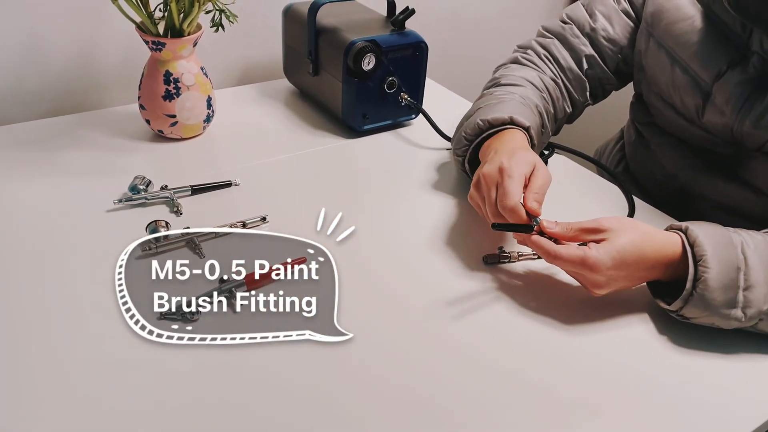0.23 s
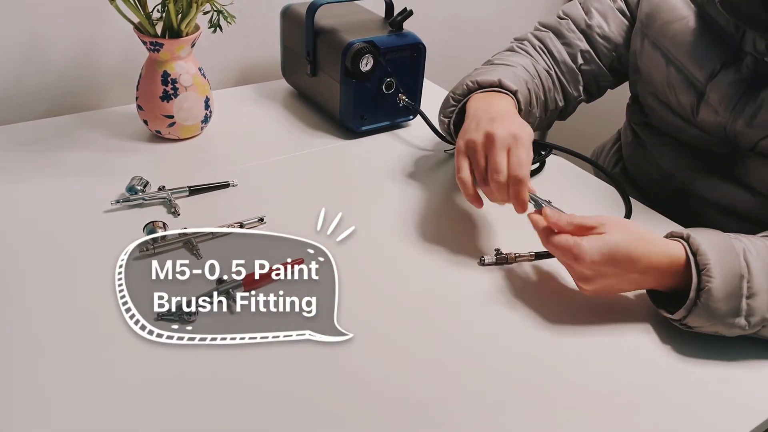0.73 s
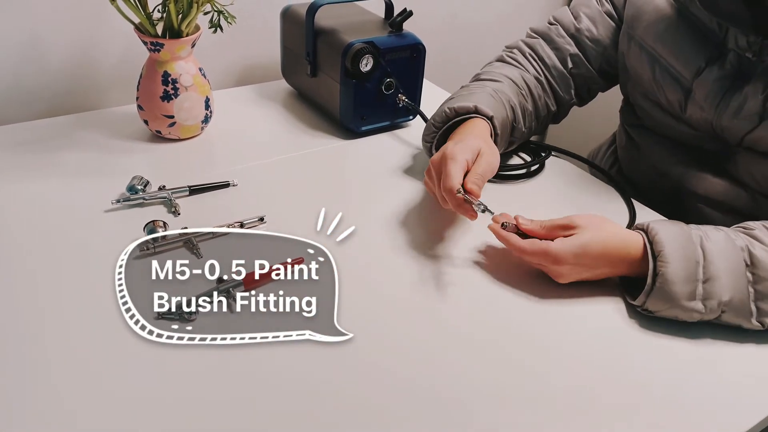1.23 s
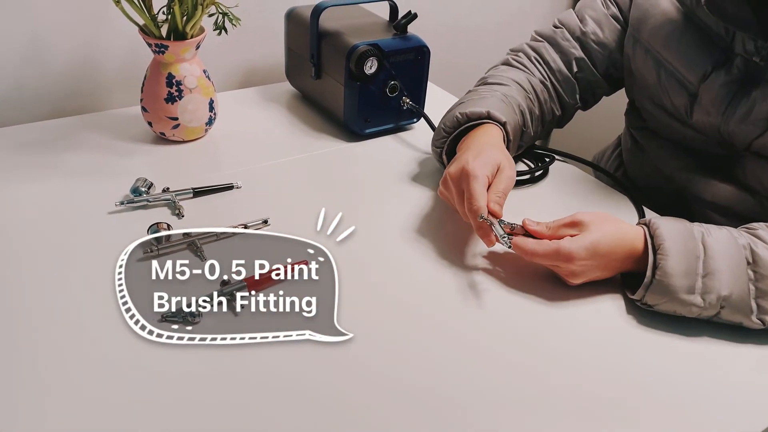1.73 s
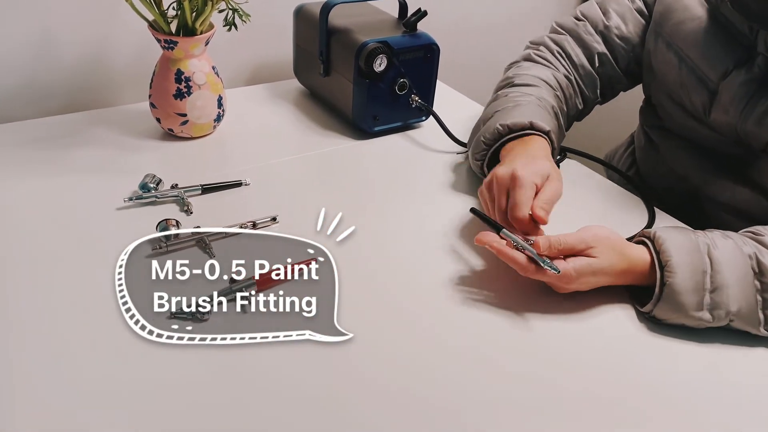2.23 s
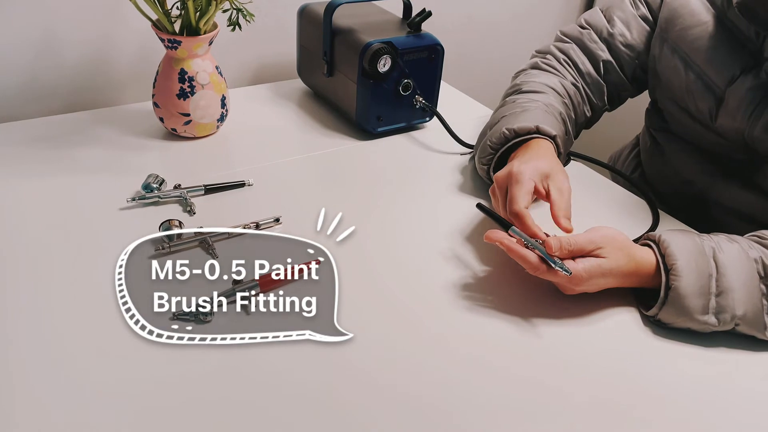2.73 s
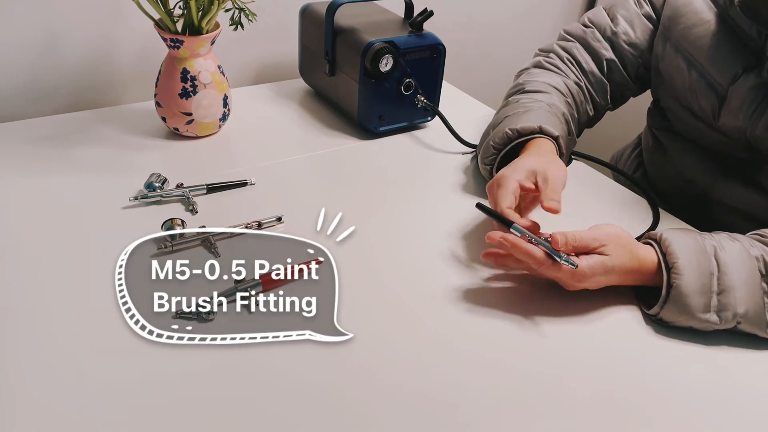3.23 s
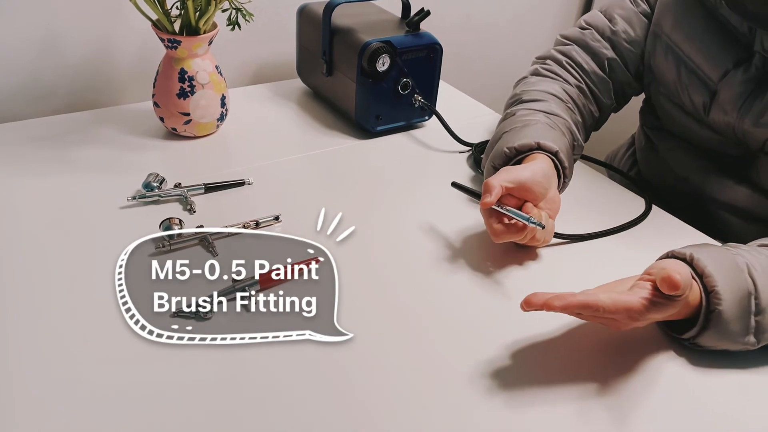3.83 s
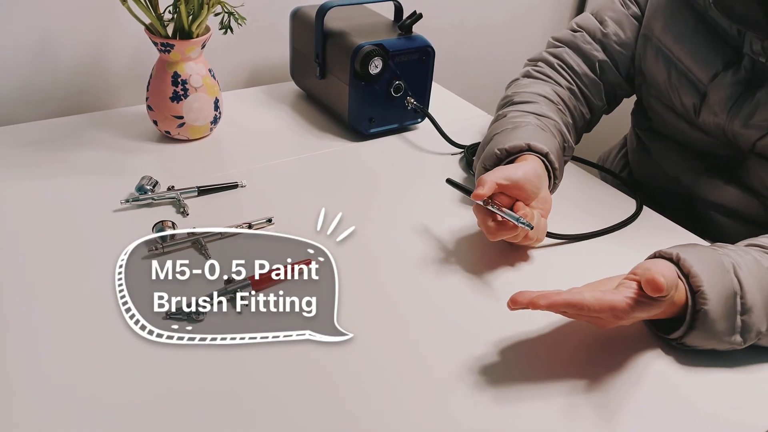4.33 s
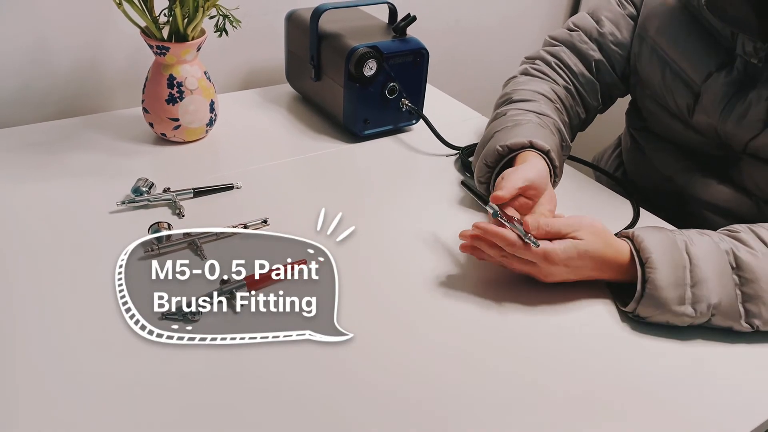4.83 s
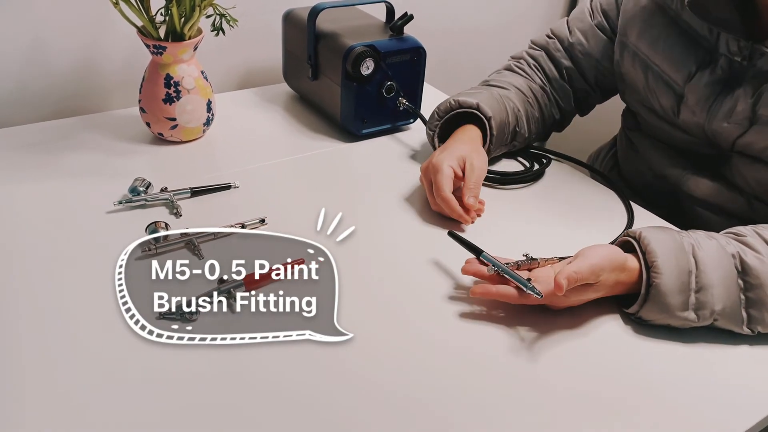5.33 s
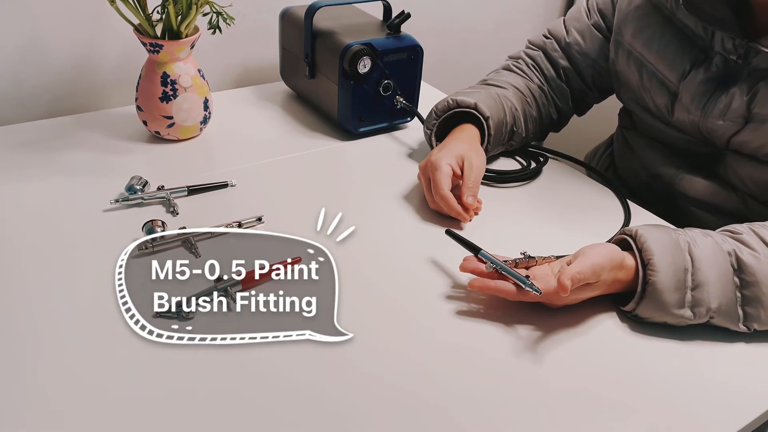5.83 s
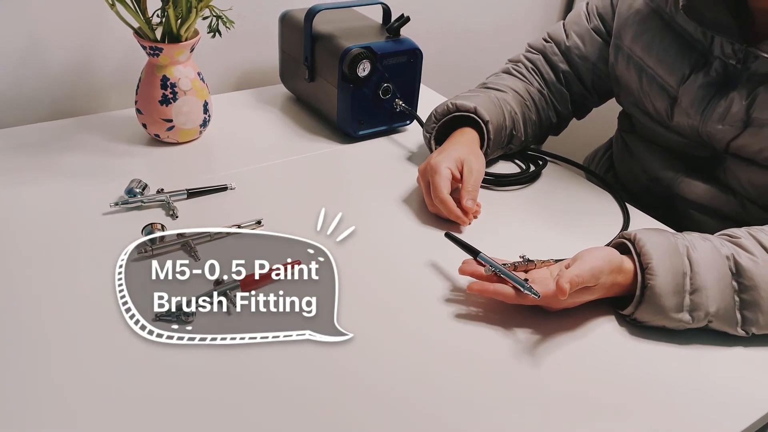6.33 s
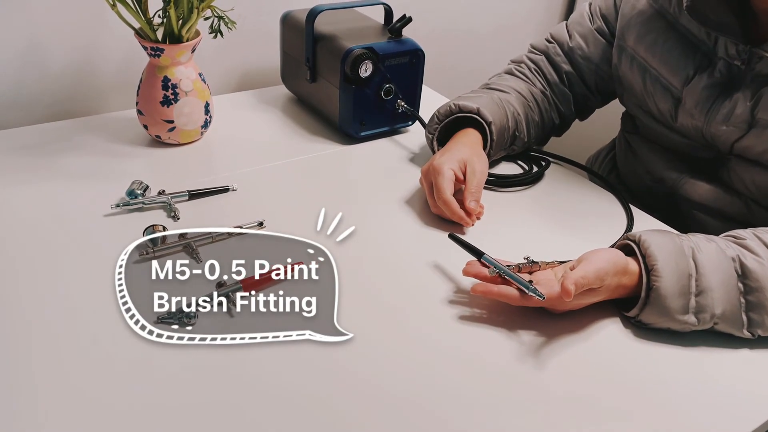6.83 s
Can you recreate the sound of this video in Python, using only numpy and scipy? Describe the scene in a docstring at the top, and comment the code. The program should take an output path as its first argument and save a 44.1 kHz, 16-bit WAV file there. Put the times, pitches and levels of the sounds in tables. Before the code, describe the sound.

Nylon sleeves swish and small metal parts click at a table, then five short air hisses and a little compressor hums up in pitch.

```python
"""Sleeves swish and metal parts click as hands fit an airbrush together at a table in a small room.
Air hisses out in five short bursts; a small piston compressor starts and its hum climbs in pitch.
Cloth, air and metal are shaped noise under timed envelopes; short reflections add the room.
The hum is a set of shaft harmonics gliding through fixed resonances of the case and the table."""
import sys
import numpy as np
from scipy import signal
from scipy.fft import rfft, irfft
from scipy.io import wavfile
from scipy.ndimage import uniform_filter1d

SR = 44100
rng = np.random.default_rng(int(sys.argv[2]) if len(sys.argv) > 2 else 0)


def unload_wav(signal):
    """Save mono or channel-first audio to the path in sys.argv[1] as 16-bit WAV at rate SR, clipped to [-1, 1]."""
    wavfile.write(
        sys.argv[1],
        SR,
        np.round(np.clip(np.atleast_2d(signal).T, -1, 1) * 32767).astype(np.int16),
    )


N = 313110
T = np.arange(N) / SR  # time of each sample (s)
BINS = np.fft.rfftfreq(N, 1 / SR)  # frequency of each spectrum bin (Hz)

# Motor speed: a quick spin-up, then a slow climb; two strokes per shaft turn: t/s, strokes per second
SPEED = [(4.0, 30.0), (4.08, 70.0), (4.14, 90.4), (4.25, 104.3), (4.3, 105.25), (4.37, 105.7),
         (4.43, 107.7), (4.49, 108.3), (4.62, 107.55), (4.78, 109.3), (5.04, 111.9), (5.11, 113.25),
         (5.27, 115.1), (5.31, 116.5), (5.39, 117.7), (5.46, 119.4), (5.56, 119.65), (5.6, 120.85),
         (5.77, 122.4), (5.88, 124.8), (5.94, 126.55), (6.04, 128.35), (6.19, 128.45), (6.28, 129.8),
         (6.36, 131.9), (6.51, 134.15), (6.68, 136.25), (6.78, 137.8), (6.87, 139.85), (6.97, 141.3),
         (7.1, 142.8)]
START_S = SPEED[0][0]


def amp(db):
    """Turn decibels into a gain."""
    return 10 ** (np.asarray(db) / 20)


def evened(x):
    """Scale to rms 1."""
    return x / np.sqrt(np.mean(x ** 2) + 1e-20)


def curve(rows):
    """Draw straight lines in time through (t/s, value) points."""
    return np.interp(T, *np.transpose(rows))


def read(points, hz):
    """Draw straight lines through (f/Hz, value) points on a log-frequency axis."""
    f, value = np.transpose(points)
    return np.interp(np.log(hz + 1), np.log(f + 1), value)


def placed(x, left_db):
    """Lean a sound to the left by a level difference between the two sides."""
    return x * amp(np.array([[left_db], [-left_db]]) / 2)


def lean_by_pitch(points):
    """Left and right gains for each bin, from (f/Hz, left minus right/dB) points."""
    return amp(np.array([[.5], [-.5]]) * read(points, BINS))


def resonances(modes, hz):
    """Complex gain of peaks and notches; the phase swings as a tone crosses each."""
    return amp(sum(db / (1 + 2j * (hz - f) / width) for f, width, db in modes))


def noise(spectrum, colour=1, likeness=None):
    """Stereo noise of rms 1; sharing one source between the sides sets how alike they are."""
    # Usual likeness of left and right: f/Hz, likeness (1 = identical)
    usual_likeness = [(100, 0.99), (500, 0.91), (1000, 0.59), (2000, 0.6), (5000, 0.53), (10000, 0.74),
                      (15000, 0.1)]
    shared, other = rfft(rng.standard_normal((2, N)))
    points = usual_likeness if likeness is None else likeness
    alike = np.clip(read(points, BINS), -1, 1)
    pair = np.array([shared, alike * shared + np.sqrt(1 - alike ** 2) * other])
    return evened(irfft(pair * amp(read(spectrum, BINS)) * colour, N))


def wander(count):
    """Chance drift of rms 1: straight lines between count random points a second."""
    knots = rng.standard_normal(8 * count)
    return evened(np.interp(T * count, np.arange(len(knots)), knots))


def strikes(times, levels_db, decay):
    """Envelope of blows that rise within 8 samples and die away exponentially."""
    total = 0
    for s, db, decay_s in np.broadcast(times, levels_db, decay):
        attack = np.clip((T - s) * SR / 8, 0, 1)
        total = total + amp(db) * attack * np.exp(-np.clip((T - s) / decay_s, 0, 20))
    return total


def gestures(rows, rise_s, fall_s):
    """Envelope of movements (t/s, length/s, level/dB) that ease in, hold and die away."""
    total = 0
    for s, length, db in rows:
        rise = np.sin(np.pi / 2 * np.clip((T - s) / rise_s, 0, 1)) ** 2
        total = total + amp(db) * rise * np.exp(-np.clip((T - s - length) / fall_s, 0, 20))
    return total


def room(x):
    """Sparse reflections from the room, each band dying at its own speed."""
    # Room decay: f/Hz, time to fall by 60 dB/s
    decay_times = [(100, 0.23), (500, 0.15), (2000, 0.28), (8000, 0.27), (15000, 0.26)]
    taps = rng.standard_normal((2, SR // 2)) * (rng.random((2, SR // 2)) < .15)
    taps[:, :130] = 0  # no reflection in the first 3 ms
    hz, t, bands = signal.stft(taps, SR, nperseg=256)
    fading = amp(-60 * t / read(decay_times, hz)[:, None])
    tail = signal.istft(bands * fading, SR, nperseg=256)[1]
    return signal.fftconvolve(x, tail / np.linalg.norm(tail[0]), axes=1)[:, :N]


def background(restless_db=2):
    """Room tone, the table booming softly under the arms, and forearm bumps ringing its lowest mode."""
    # Room tone: f/Hz, level/dB per Hz
    room_tone = [(15, -75), (30, -48), (42, -13), (53, 6), (70, -6.5), (100, -4.5), (135, 3), (200, -4),
                 (300, -14), (500, -23.5), (1000, -27), (1600, -24), (2800, -46), (5000, -41),
                 (9000, -37.5), (14000, -69), (15800, -54)]
    # The table's dull boom: f/Hz, level/dB per Hz
    boom = [(20, -70), (31, -48), (40, -18), (55, -20), (75, -7.5), (118, 1.5), (140, 5.5), (170, -20),
            (200, 0.5), (260, -12.5), (500, -16.5), (900, -30), (2000, -56)]
    # A forearm bumps the table: t/s, level/dB
    bump_rows = [(1.8, -50), (2.478, -46.5), (2.641, -45.5), (2.68, -49), (2.858, -51)]
    # The arms shift their weight on the table: t/s, length/s, level/dB
    shifts = [(.53, 0.15, -57.5), (.72, 0.041, -59), (1.65, 0.023, -52.5), (1.76, 0.048, -62),
              (2.17, 0.11, -59.5), (2.7, 0.049, -63), (3.39, 0.098, -54), (3.62, 0.74, -58)]
    mode_hz, swell_s = 119, 0.018  # the table's lowest mode and the time it takes to swell
    quiet_db, resting_arms_db = -63.5, -65

    swelling = 0
    for s, db in bump_rows:
        u = np.clip((T - s) / swell_s, 0, 30)
        swelling = swelling + amp(db) * u * np.exp(1 - u)
    bumps = swelling * np.sin(2 * np.pi * mode_hz * T)
    resting = amp(resting_arms_db + restless_db * wander(count=12))
    weight = np.hypot(resting, gestures(shifts, rise_s=0.018, fall_s=0.069))
    hush = noise(room_tone) * amp(quiet_db + 1.7 * wander(count=9))
    return placed(hush + noise(boom) * weight + bumps, left_db=1)


def sleeves(patchy_db=1.47, grain_db=0.5):
    """Nylon slides over the table with fine grain and crackling creases; a small part scrapes too."""
    # The hiss of nylon: f/Hz, level/dB per Hz
    cloth = [(240, -36), (400, -5), (606, -10.5), (890, -9), (2490, -4), (3610, -7.5), (5900, -6.5),
             (11600, -11.5), (14400, -13.5), (15800, -26)]
    # Strokes of a sleeve over the table: t/s, length/s, level/dB, release/s
    swishes = [(0.502, 0.1, -72, 0.024), (0.678, 0.08, -73.5, .056), (0.79, 0.094, -63, 0.06),
               (0.916, 0.096, -66.5, 0.064), (1.015, 0.088, -65, 0.058), (1.136, 0.12, -72, 0.1),
               (1.814, 0.19, -74.5, .05), (1.883, 0.19, -66.5, 0.034), (1.973, .08, -72, .03),
               (2.11, 0.14, -62, 0.037), (2.247, 0.099, -72.5, 0.0073), (3.202, 0.091, -57.5, 0.11),
               (3.429, 0.13, -63, 0.029)]
    # Crackling creases: snaps per second, level above the swish/dB, spread of sizes/dB
    rate, crease_db, spread_db = (260, -8.5, 6)
    # The sound of the scrape: f/Hz, level/dB per Hz
    grate = [(1000, -38), (1700, -2), (2150, -6), (2700, -5), (4500, -38)]
    # A small part scrapes over the table: t/s, length/s, level/dB
    scrape_row = (1.053, 0.056, -64.5)
    stir_db = -82  # the jacket never quite keeps still

    grain = amp(patchy_db * wander(count=40) + grain_db * wander(count=900))
    sizes = amp(spread_db * np.minimum(rng.exponential(1, N), 3))
    snaps = (rng.random(N) < rate / SR) * sizes
    snap_decay = np.exp(-T[:200] / .0006)
    crackle = amp(crease_db) * evened(signal.oaconvolve(snaps, snap_decay)[:N])
    slide = amp(stir_db) + sum(gestures([row[:3]], 0.065, row[3]) for row in swishes)
    swish = noise(cloth) * slide * np.hypot(1, crackle)
    scraping = gestures([scrape_row], rise_s=.06, fall_s=0.11) * amp(3.0 * wander(count=260))
    return placed(swish * grain + noise(grate) * scraping, left_db=2.5)


def fittings():
    """Sharp metal ticks with duller knocks under them, a snapping cap and a part touching the table."""
    # Metal parts click: t/s, tick level/dB, tick decay/s, knock through the hand before an 11.5 dB cut/dB
    clicks = [(0.9625, -48, 0.0016, -62), (1.3224, -45.5, 0.0018, -54), (1.366, -55.5, 0.0058, -66),
              (1.5203, -43, 0.00057, -43), (1.5239, -38, 0.0019, -44.5), (1.653, -58, 0.009, -50),
              (1.7527, -57, 0.00091, -52), (1.7553, -33, 0.0014, -33), (1.896, -50.5, .0025, -59),
              (1.9198, -56, .003, -44), (2.2408, -54, .0012, -62), (2.943, -72, .006, -66),
              (3.17, -71, .004, -64), (3.384, -57, .002, -58)]
    # Sound of the ticks: f/Hz, level/dB per Hz
    tick = [(300, -25), (1000, -2), (2700, 0), (5000, -7), (8000, -4.5), (12000, 1), (15500, -9)]
    # Sound of the knocks: f/Hz, level/dB per Hz
    knock = [(60, -27), (115, 11), (220, -11), (390, -4.5), (500, 5.5), (750, -3), (1300, -19), (3000, -15),
             (8000, -22)]
    # The cap snaps into its seat: t/s, level/dB
    cap_snaps = [(2.2407, -46)]
    # The cap's hollow ring: f/Hz, level/dB per Hz
    cap_ring = [(700, -23), (1200, -10), (1500, 6), (2000, 0), (3000, -6.5), (4500, -14), (9000, -34),
                (15000, -36)]
    # A part touches the table top: t/s, level/dB
    touches = [(0.929, -51), (0.937, -58), (0.956, -53.5), (0.965, -51), (0.973, -57), (0.986, -59)]
    # The ring of that touch: f/Hz, level/dB per Hz
    clack = [(400, -5), (850, -3), (1250, 8), (1600, -1), (2100, -2.5), (3200, -13), (8000, -23),
             (15000, -24)]

    s, tick_db, tick_s, knock_db = np.transpose(clicks)
    ticks = noise(tick) * strikes(s, tick_db, tick_s)
    knocks = noise(knock) * strikes(s, knock_db - 11.5, decay=0.027)
    snaps = noise(cap_ring) * strikes(*np.transpose(cap_snaps), decay=0.0076)
    taps = noise(clack) * strikes(*np.transpose(touches), decay=0.012)
    return placed(ticks + knocks + snaps + taps, left_db=2.0)


def airbrush(shut_s=0.011, sag_db_per_s=14):
    """The valve snaps open and the jet of air weakens as the hose empties; the trigger squeaks once."""
    # Trigger presses: open t/s, shut t/s, level before the jet's gain of about 3.5 dB/dB
    presses = [(3.605, 3.715, -38.5), (3.795, 3.899, -39.5), (3.991, 4.103, -41), (4.182, 4.304, -42.5),
               (4.384, 4.55, -43.5)]
    # Sound of the jet: f/Hz, level/dB per Hz
    jet_spectrum = [(120, -25), (200, -16), (330, -5), (440, -6), (520, -10.5), (588, -1.5), (660, -10.5),
                    (803, -17), (950, -16.5), (1100, -14.5), (1200, -12), (1400, -14.5), (2000, -18.5),
                    (2590, -17), (4160, -16.5), (8800, -12.5), (12900, -7), (14800, -9), (15800, -23)]
    # The jet's lean to the left: f/Hz, left minus right/dB
    jet_side = [(60, -5), (110, -9), (200, 0), (380, 1), (700, -0.5), (1290, 4), (2380, 0), (4400, 0),
                (8120, 4.5), (15000, 0)]
    # Likeness of the jet's two sides: f/Hz, likeness (1 = identical)
    jet_likeness = [(500, 1), (2000, 0.92), (5000, 0.81), (8500, 0.92), (11000, 0.52), (14000, 0.14)]
    # Colour of the nozzle: f/Hz, width/Hz, level/dB
    nozzle = [(750, 220, 11.5), (7700, 1500, 1.5), (8940, 600, 5.5)]
    # The trigger's squeak: t/s, length/s, middle f/Hz
    s, length, hz = (4.039, .032, 3850)
    squeak_db = -39.5

    flow = 0
    for opens, shuts, db in presses:
        opening = np.clip((T - opens) / .005, 0, 1)
        closing = np.exp(-np.clip((T - shuts) / shut_s, 0, 20))
        sagging = amp(db - sag_db_per_s * np.clip(T - opens, 0, shuts - opens))
        flow = flow + sagging * opening * closing
    colour = resonances(nozzle, BINS) * lean_by_pitch(jet_side)
    jet = noise(jet_spectrum, colour, jet_likeness) * flow * amp(3.5 + .5 * wander(count=120))
    tone = np.sin(2 * np.pi * np.cumsum(hz + 60 * wander(count=400)) / SR)
    squeak = tone * np.sin(np.pi * np.clip((T - s) / length, 0, 1))
    return jet + amp(squeak_db) * squeak


def scatter(hz, decay):
    """Complex gain of a cluster of short reflections, rms 1."""
    t = np.arange(4096) / SR
    cluster = rng.standard_normal(len(t)) * np.exp(-t / decay)
    response = rfft(cluster, 2 * (len(hz) - 1))
    return evened(abs(response)) * np.exp(1j * np.angle(response))


def hum(turns, shaft_hz, ring_s=0.026, scatter_hz=1900, spread_hz=1100, smear=0.418, loose_order=20.5,
        lopsided=0.29, count=72):
    """Shaft harmonics glide through fixed resonances; high ones lose step and scatter among panel modes."""
    # Stroke harmonics: f/Hz, level/dB
    strokes = [(90.0, -58.5), (210.0, -41), (320.0, -13), (620.0, -43), (1050.0, -39.5), (1300.0, -65.5),
               (1750.0, -63.5), (3000.0, -61), (4300.0, -90)]
    # Weaker harmonics between them, from the two strokes being unequal: f/Hz, level/dB
    uneven = [(90.0, -94), (210.0, -65), (320.0, -72.5), (620.0, -69), (1050.0, -53.5), (1300.0, -60.5),
              (1750.0, -64.5), (3000.0, -62.5), (4300.0, -74.5)]
    # Shape of one turn of the shaft: shaft harmonic, level/dB
    turn_shape = [(2, 3), (3, 8.5), (4, -15.5), (5, 22), (6, -11), (7, 19), (8, -11.5), (9, 15), (10, -2),
                  (11, 4), (12, -16.5), (13, 6), (14, -6.5), (15, 7.5), (16, -3.5), (17, 0.5), (18, -2.5),
                  (19, 0.5), (20, 6.5), (21, 2.5), (22, 3.5), (23, 0.5), (24, 4.5), (25, -1), (26, 10),
                  (27, 1.5), (28, 6), (29, -8), (30, 5.5), (31, 2), (32, 5), (33, -8), (34, 3.5), (35, -13),
                  (36, 7), (37, -5), (38, 4.2), (39, -8.5), (40, -3), (41, -5), (42, 8.5), (43, -11),
                  (44, 5.5), (45, -20), (46, 3), (47, -7.5), (48, 9), (49, -9.5), (50, 4), (51, -11.5),
                  (52, 5), (53, -9), (54, 10), (55, -15), (56, 6.5), (57, -12), (58, 9), (59, -22), (60, 5),
                  (61, -2.5), (71, 1.5)]
    # Peaks and notches of case and table: f/Hz, width/Hz, level/dB
    case = [(105.7, 5.4, -9.5), (121.6, 9.3, 6.5), (132.1, 4.3, -14.5), (138.2, 8.9, 13.5), (227, 19, -16),
            (242, 8.6, -7.5), (259.3, 5.2, 5.5), (268, 6.7, -19), (302.8, 37.4, -15.5), (329.6, 17.7, -23),
            (343.8, 14.5, -14.5), (388.2, 6.1, -25.5), (424.7, 17, -6), (449.5, 7.7, -16), (478, 43, -12),
            (511.4, 7.4, -11.5), (537, 24, 7), (578.4, 16.7, -20.5), (610, 31, 0), (673, 42, -4.5),
            (730, 54, -8.5), (795.8, 20, 12.5), (852, 12, -8), (903, 6.5, -24), (937, 29, 5.5),
            (955, 34, -9.5), (969.3, 17, 5), (1019, 5.6, -15), (1059.4, 43, -8), (1087.6, 48, 7),
            (1129, 118, -6.5), (1159, 36, 10.5), (1188, 15, 4), (1240, 27, -17), (1410, 12.9, -9),
            (1478, 45, 14), (1495, 63, -5), (1533, 10, -18), (1730, 59, 4), (1796, 30, 7), (1817, 29, -4),
            (1943, 94, -8), (1970, 20, 11), (2040, 21, 0.5), (2260, 36, 2), (2318, 150, -16.5),
            (2530, 18, -1), (2560, 33, -2), (2657, 50, -10), (2860, 110, -19), (3060, 168.2, -13),
            (3110, 47, 6.7), (3060, 160, -12), (3130, 10.1, -11), (3590.8, 55.0, -9), (3690, 60.2, 7),
            (3790, 320, -9.5)]
    # Peaks and notches of the pump rocking once a turn: f/Hz, width/Hz, level/dB
    rocking = [(201, 17, 10), (292.7, 15, -16), (484, 54, -17), (629.2, 45, 6.5), (843, 25, -14),
               (896, 42, -14), (968, 100, -13.5), (1085, 52, -7), (1303.6, 46, -20), (1598, 47, 7.5),
               (1740, 40, 4), (2055, 75, 7.5), (2140, 91, 6), (2540, 22, 0), (2630, 22, 10),
               (2727, 33, 10.5), (2994, 38, 8.5), (3043, 70, 13.5), (3180, 45, -12), (3470, 130, -2.5),
               (3760, 28, -7)]
    # Each stroke harmonic shakes the case in its own pattern, so it swells or cancels at its own pitches:
    # stroke harmonic, f/Hz, width/Hz, level/dB
    handovers = [(6, 795, 30, -5.5), (6, 620, 40, 5), (6, 830, 30, 4.5), (7, 778, 23, 0), (7, 852, 15, -11),
                 (8, 910, 15, -6), (8, 916, 30, 6), (8, 1064, 21, -19), (9, 957, 8.4, -16),
                 (9, 1037, 35, 7.5), (9, 1125, 36, 4.5), (10, 1085, 30, 2.5), (10, 1138, 28.6, -25),
                 (10, 1420, 150, 3), (11, 1462, 50, -16), (12, 1480, 50, -8), (12, 1630, 100, -4),
                 (13, 1660, 23, -19), (13, 1800, 35, -13), (14, 1630, 57, 7), (14, 1995, 30, 6),
                 (15, 1975, 40, -12), (16, 1792, 36, 11.5), (16, 1940, 110, -11), (24, 2590, 45, 2),
                 (27, 3050, 70, 5)]

    hz = np.fft.rfftfreq(32768, 1 / SR)

    def above(edge_hz, order):
        """Share that grows from 0 to 1 above an edge frequency."""
        return 1 / (1 + (edge_hz / (hz + 1)) ** order)

    dense = .4 * above(scatter_hz, order=6)

    def blend():
        """Direct sound mixed with scatter among the panel modes."""
        return np.sqrt(1 - dense) + np.sqrt(dense) * scatter(hz, ring_s)

    strong = amp(read(strokes, hz)) * resonances(case, hz) * blend()
    weak = amp(read(uneven, hz)) * resonances(rocking, hz) * blend()
    # each mode reaches the two sides at its own phase and level
    side_phase = 1j * np.cos(np.angle(scatter(hz, ring_s)))
    side_level = lopsided * scatter(hz, 0.004).real
    side = above(spread_hz, order=2) * (side_phase + side_level)

    on = T > START_S
    rotor, phasor = np.exp(2j * np.pi * turns[on]), 1
    mid_sum, side_sum = 0, 0
    for k in range(1, count):
        phasor = phasor * rotor
        at = np.rint(k * shaft_hz[on] / hz[1]).astype(int)  # the bin this harmonic is crossing
        # even shaft harmonics are the stroke harmonics
        own_pattern = [row[1:] for row in handovers if 2 * round(row[0]) == k]
        body = (weak if k % 2 else strong) * resonances(own_pattern, hz)
        # the rocking keeps no step with the blows
        lag = np.pi if k % 2 else smear * (1 + (k / loose_order) ** 4)
        level = amp(np.interp(k, *np.transpose(turn_shape), left=-20))
        line = phasor * body[at] * level * np.exp(1j * lag * rng.standard_normal())
        mid_sum = mid_sum + line.real
        side_sum = side_sum + (line * side[at]).real
    out = np.zeros((2, N))
    out[:, on] = np.sqrt(2) * np.array([mid_sum + side_sum, mid_sum - side_sum])
    return out


def clatter(turns, colour, decay_s=0.074, unlike=0.93):
    """The two strokes in a turn each set off a dense ring, partly shared, the same every time."""
    # Ring of the pump's metal parts after each stroke: f/Hz, level/dB per Hz
    metal_ring = [(900, -39), (2000, -3.5), (3000, -1.5), (3600, -23), (4200, -13), (5200, -9),
                  (6500, -17.5), (7750, -13), (9500, -21), (10450, -23), (12000, -26), (15500, -30)]
    out, shared = 0, noise(metal_ring, colour)
    fade = np.exp(-T[:SR // 6] / decay_s)
    for offset in (0, .5):
        whole_turns = np.arange(np.ceil(turns[0]), turns[-1] - 1)
        at = np.interp(whole_turns + offset, turns, np.arange(N))
        # a sinc pulse puts each stroke between samples
        near = at.astype(int)[:, None] + np.arange(-8, 9)
        pulses = np.zeros(N)
        pulses[near] = np.sinc(near - at[:, None])
        ring = (shared + unlike * noise(metal_ring, colour))[:, :SR // 6] * fade
        out = out + signal.oaconvolve(pulses[None], ring, axes=1)[:, :N]
    return evened(out)


def compressor(throb=0.1, puff_share=0.53, tick_share=0.41):
    """Piston strokes drive hum, clatter, throbbing air and valve ticks; start-up adds judder and a thump."""
    # Air rushing through the pump: f/Hz, level/dB per Hz
    rush_spectrum = [(20, -45), (50, -15), (120, 0), (350, 1.2), (600, 1), (800, -1.3), (1050, -3.2),
                     (1300, -1), (1600, -2.5), (2300, -7), (2700, -8.5), (4000, -16.5), (5500, -31),
                     (8000, -33), (11000, -26), (15500, -36)]
    # Ticks of its valves: f/Hz, level/dB per Hz
    valve_spectrum = [(1500, -28), (3000, -8), (4200, -3), (5500, -12.5), (6700, -6.5), (7750, -2),
                      (8600, -6), (9300, -11), (10400, -1.5), (11700, -9.5), (15500, -20)]
    # Narrow rings and notches of the valve reeds: f/Hz, width/Hz, level/dB
    reeds = [(3800, 90, 3.5), (4164, 73, 8.5), (4890, 70, 10.5), (5050, 80, -7), (5480, 130, 7),
             (5840, 83, 6.5), (6150, 86, 8), (6500, 130, 4), (6980, 160, 3), (7700, 260, 3), (8130, 90, 0),
             (9000, 180, 2), (10350, 130, 5.5), (10560, 200, -5.5), (10970, 120, 5)]
    # The first gulp of air at start-up: t/s, length/s, level/dB
    gulp = (4.02, 0.21, -45.5)
    # The case judders as the motor spins up: t/s, length/s, level/dB
    judder_row = (4.12, 0.061, -39.5)
    # The ring of the juddering case: f/Hz, level/dB per Hz
    shell = [(150, -23), (320, 11.5), (410, 2), (530, 6), (700, -12), (880, -4), (980, 11), (1100, 7),
             (1300, -4), (3000, -22)]
    # The motor's first jerk thumps the table: t/s, level/dB, decay/s
    kick_row = (4.062, -41.5, 0.039)
    # Sound of that thump: f/Hz, level/dB per Hz
    thump = [(60, -25), (140, 6), (260, -4), (370, 0), (520, -17), (1200, -30)]
    # The pump's lean to the left: f/Hz, left minus right/dB
    pump_side = [(130, 2.2), (400, 2), (700, 1.7), (1100, 3.5), (2000, 3), (3200, 2.5), (4800, 1.5),
                 (6000, 3), (15000, 0)]
    working_hz, growth = 104.2, 12  # stroke rate of full effort, and the power by which effort grows
    hum_db, clatter_db = -0.5, -58.5
    # as the pressure builds, the rush of air grows and the valve ticks fade ever faster
    rush_db, rush_db_per_s = -52.4, 1.5
    valves_db, valves_fade_db_per_s2 = -53, 2.0

    stroke_hz = uniform_filter1d(curve(SPEED), 2048)
    turns = np.cumsum(stroke_hz / 2 * (1 + .0006 * wander(count=30))) / SR
    effort = np.minimum(stroke_hz / working_hz, 1) ** growth
    running_s = np.maximum(T - START_S, 0)
    # each stroke starts a pulse that fades over a share of the stroke
    stroke_phase = 2 * turns % 1
    puff = evened(np.exp(-stroke_phase / puff_share))
    tick = evened(np.exp(-stroke_phase / tick_share))

    metal = resonances(reeds, BINS)
    tones = amp(hum_db) * hum(turns, stroke_hz / 2) + amp(clatter_db) * clatter(turns, metal)
    flow = effort * amp(rush_db + rush_db_per_s * running_s)
    flow = flow + gestures([gulp], rise_s=0.041, fall_s=0.013)
    rush = noise(rush_spectrum, metal) * evened(1 + throb * puff) * flow
    judder = noise(shell) * evened(.5 + puff) * gestures([judder_row], rise_s=0.04, fall_s=0.1)
    valves_level = amp(valves_db - valves_fade_db_per_s2 * running_s ** 2)
    valves = noise(valve_spectrum, metal) * evened(0.59 + tick) * effort * valves_level
    kick = noise(thump) * strikes(*kick_row)
    body = tones * effort + rush + judder + kick
    return irfft(rfft(body) * lean_by_pitch(pump_side), N) + placed(valves, left_db=3.0)


def scene():
    """All sources at the table; the room answers the airbrush and the clicks."""
    air, clicks = airbrush(), fittings()
    echoes = amp(-7.0) * room(air) + amp(-10.5) * room(clicks)
    return background() + sleeves() + clicks + air + compressor() + echoes


def record(dry):
    """A steep low-pass filter removes the treble above its edge."""
    edge_hz = 15850
    low_pass = signal.firwin(301, edge_hz, window=("kaiser", 9), fs=SR)
    return signal.oaconvolve(dry, low_pass[None], "same")


dry = scene()
out = record(dry)
unload_wav(out)
```